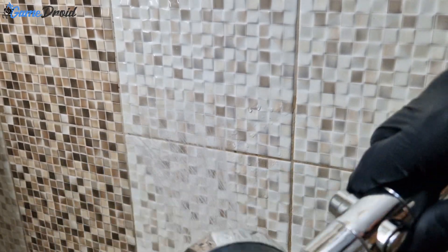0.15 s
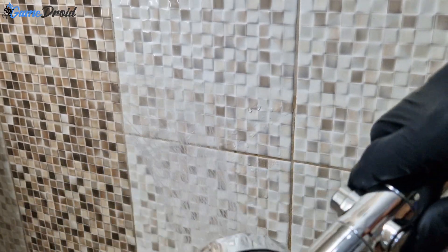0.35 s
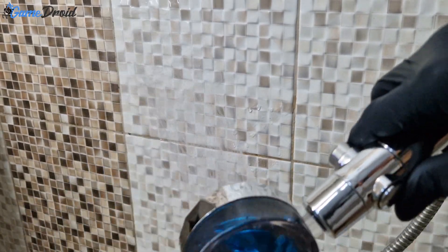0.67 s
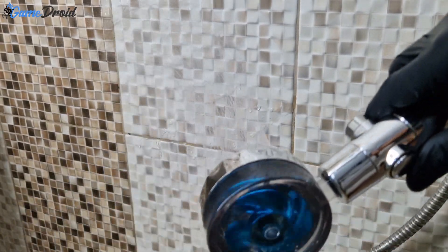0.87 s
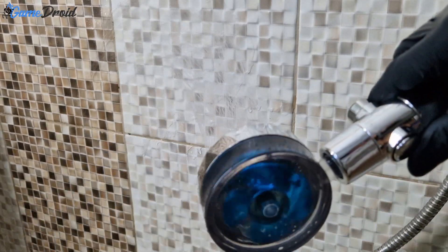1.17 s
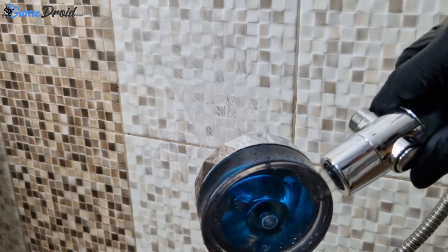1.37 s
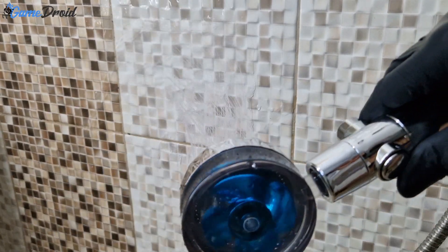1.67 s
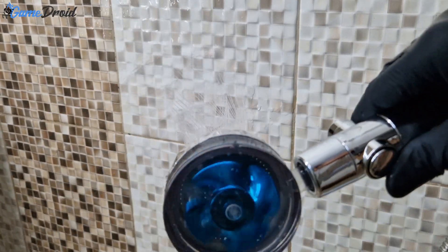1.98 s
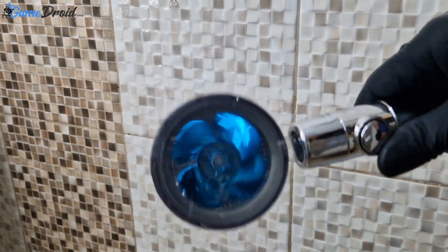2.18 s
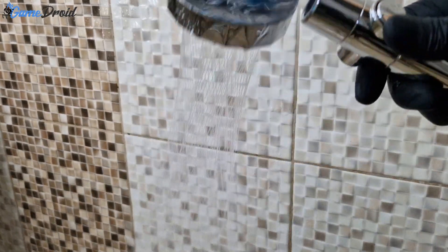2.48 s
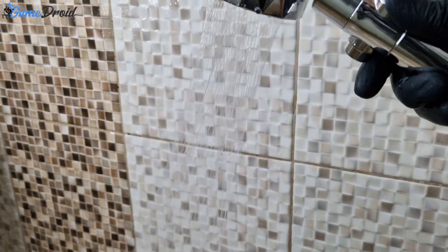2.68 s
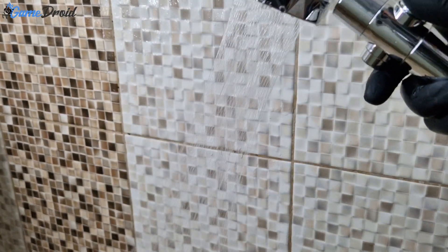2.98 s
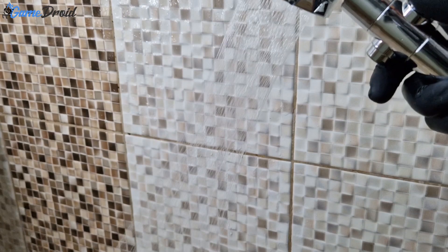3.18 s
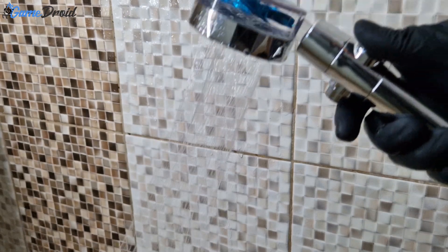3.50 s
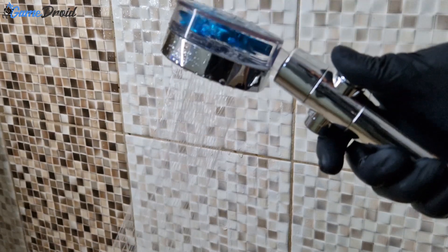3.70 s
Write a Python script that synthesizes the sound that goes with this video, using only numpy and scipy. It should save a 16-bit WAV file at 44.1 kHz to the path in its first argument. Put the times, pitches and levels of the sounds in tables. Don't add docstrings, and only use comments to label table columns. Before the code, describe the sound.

Shower water fizzes steadily in a small tiled bathroom, swelling briefly with splashes and hollow drips

```python
import sys
import numpy as np
from scipy import signal
from scipy.fft import rfft, irfft, next_fast_len
from scipy.io import wavfile
from scipy.ndimage import uniform_filter1d, map_coordinates

SR = 44100
rng = np.random.default_rng(int(sys.argv[2]) if len(sys.argv) > 2 else 0)


def voltage_ratio(level):
    return 10 ** (np.asarray(level, float) / 20)


def wav_out(sig):
    wavfile.write(sys.argv[1], SR, np.round(np.clip(np.atleast_2d(sig).T, -1, 1) * 32767).astype(np.int16))


N = 169785


def unit(x):
    return x / np.sqrt(np.mean(x ** 2) + 1e-20)


def along(points, hz):
    f, v = np.transpose(points)
    return np.interp(np.log(hz + 1), np.log(f + 1), v)


def curves(rows):
    s, *cols = np.transpose(rows)
    return [np.interp(np.arange(N) / SR, s, c) for c in cols]


def wobble(rate):
    return map_coordinates(rng.standard_normal(N // 100), [np.arange(N) * rate / SR])


def filtered(x, response):
    m = next_fast_len(N + SR // 2)
    return irfft(rfft(x, m) * response(np.fft.rfftfreq(m, 1 / SR)), m)[..., :N]


# [f/Hz, likeness 0-1]
LIKENESS = [(60, 0.87), (200, 1), (400, 0.68), (700, 0.44), (1200, 0.012), (2500, 0.025), (15000, .0)]


def spread(pair, gain):
    turn = lambda hz: np.arccos(np.clip(along(LIKENESS, hz), -1, 1)) / 2
    mid, side = filtered(pair, lambda hz: gain(hz) * [np.cos(turn(hz)), np.sin(turn(hz))])
    return unit(np.array([mid + side, mid - side]))


def droplets(patchy_db):
    drops_per_s, size_db, direct = 9000, 2, 0.19
    hit = rng.random((2, N)) < drops_per_s / SR
    size = voltage_ratio(size_db * np.minimum(rng.exponential(size=(2, N)), 3))
    ticks = unit(hit * rng.standard_normal((2, N)) * size)
    echoes = rng.standard_normal((2, N))
    z = signal.stft(direct * ticks + np.sqrt(1 - direct ** 2) * echoes, nperseg=512)[2]
    field = uniform_filter1d(rng.standard_normal(z.shape[1:]), size=4, axis=0)
    field = uniform_filter1d(field, size=5, axis=1)
    return signal.istft(z * voltage_ratio(patchy_db * unit(field)), nperseg=512)[1][:, :N]


def pings(start_s, gain, hz, tau_s, rise, pan):
    t = np.arange(SR // 8) / SR
    u = t / tau_s[:, None]
    envelope = np.exp(-u) * (1 - np.exp(-t / .0012))
    glide = 1 + rise * np.minimum(u, 3)
    wave = gain[:, None] * envelope * np.sin(2 * np.pi * hz[:, None] * t * glide)
    at = np.round(start_s * SR).astype(int)[:, None] + np.arange(len(t))
    lag = np.round(pan * 12).astype(int)[:, None]

    def ear(side):
        heard = wave * voltage_ratio(side * 2 * pan)[:, None]
        return np.bincount((at + 20 + side * lag).ravel(), heard.ravel(), N + SR)[20:N + 20]

    return np.array([ear(-1), ear(1)])


def plinks():
    per_s, centre_hz, cycles, level_db = 220, 3566, 5, -22
    draw = rng.random((700, 5))
    s = np.cumsum(-np.log(draw[:, 0])) / per_s + 1.9
    s, draw = s[s < N / SR], draw[s < N / SR]
    hz = centre_hz * np.exp(0.87 * (draw[:, 1] - .5))
    gain = voltage_ratio(level_db - 5.77 * np.log(draw[:, 2]))
    return pings(s, gain, hz, cycles * (.5 + draw[:, 3]) / hz, 0.019, 2 * draw[:, 4] - 1)


# [t/s, level/dB, share of the jets on the tray 0-1]
AIM = [(0, -47, 0), (.14, -50, 0.3), (.24, -47, 0.16), (.32, -47.5, 0.14), (1.0, -46.5, 0),
       (2.4, -46.5, 0.03), (2.58, -51.5, 0.18), (2.635, -49.5, 0.5), (2.66, -41, 0.8), (2.8, -37.5, 0.8),
       (2.88, -35.5, 0.77), (3.04, -38, 0.95), (3.2, -42.5, 0.58), (3.33, -39, 0.73), (3.41, -44.5, 0.63),
       (3.63, -47.5, 0.06), (3.72, -44.5, 0.05), (3.85, -48.5, 0.2)]
# [f/Hz, level/dB]
WALL_COLOUR = [(600, -13), (1800, -11), (3800, -7.5), (5500, -7.5), (8800, -8), (9500, -2.5), (12500, -2),
               (15500, -3.5)]
# [f/Hz, level/dB]
TRAY_COLOUR = [(700, -28), (2000, -20.5), (2800, -4.5), (4800, 0), (6500, -.5), (8800, -3), (9500, 2),
               (15500, -3.5)]


def spray():
    level_db, share = curves(AIM)
    share = np.clip(share, 0, 1)
    gain = voltage_ratio(level_db + .25 * wobble(5) + .45 * wobble(16))
    wall = spread(droplets(patchy_db=1.28), lambda hz: voltage_ratio(along([(100, -32)] + WALL_COLOUR, hz)))
    wall = wall * voltage_ratio(0.093 * wobble(7.68))
    tray = spread(droplets(patchy_db=1.2), lambda hz: voltage_ratio(along([(100, -60)] + TRAY_COLOUR, hz)))
    tray = tray * voltage_ratio(.5 * wobble(23))
    return gain * (np.sqrt(1 - share) * wall + np.sqrt(share) * (tray + plinks()))


def modes(table, f):
    return sum(voltage_ratio(2 * db) / (1 + (2 * (f - c) / w) ** 4) for c, w, db in table)


# [t/s, level/dB]
RUNOFF_LEVEL = [(0, -59), (.3, -56.5), (.7, -59), (1.2, -62.5), (1.7, -61.5), (2.3, -62.5), (2.55, -64),
                (2.85, -59.5), (3.1, -62), (3.85, -61)]
# [f/Hz, width/Hz, level/dB]
RUNOFF_ROOM_MODES = [(289, 49, -4.5), (346, 40, -4), (402.7, 24, -1.5), (489.5, 6, 3), (537.6, 14.4, 0),
                     (644, 180, -13), (741, 30, 2.5), (808, 38, -1), (892, 57, -6), (1034, 96, -3),
                     (1238.5, 15.5, 3.5), (1466, 43, 1.5), (2063, 180, -4)]
# [f/Hz, level/dB]
WASH = [(30, -31), (90, -8), (150, -14.5), (300, -19), (900, -11.5), (2000, -5.5), (4000, -16)]


def runoff():
    level_db, = curves(RUNOFF_LEVEL)
    lumpy = droplets(patchy_db=1.5) * voltage_ratio(1.4 * wobble(18))
    tray = spread(lumpy, lambda f: np.sqrt(voltage_ratio(2 * along(WASH, f)) + modes(RUNOFF_ROOM_MODES, f)))
    return voltage_ratio(level_db) * tray


# [f/Hz, width/Hz, level/dB]
ROOM_MODES = [(60, 29, -6), (95.5, 17, -14), (209.4, 23, -0.5), (222, 16, -4.5)]
# [t/s, level/dB]
ROOM_LEVEL = [(0, -69.5), (.5, -71.5), (1.2, -73.5), (1.6, -72), (2.4, -74), (3.0, -83), (3.45, -71.5),
              (3.85, -81)]


def room():
    level_db, = curves(ROOM_LEVEL)
    return voltage_ratio(level_db) * spread(rng.standard_normal((2, N)), lambda f: np.sqrt(modes(ROOM_MODES, f)))


# [t/s, level/dB]
PIPE_LEVEL = [(0.0, -82), (0.1, -72), (0.14, -97), (0.23, -74), (0.45, -85.5), (0.48, -74.5), (1.31, -79),
              (1.67, -71), (1.71, -80), (2.04, -66.5), (2.53, -76.5), (2.69, -70.5), (2.94, -84),
              (2.98, -72), (3.26, -77), (3.29, -72), (3.83, -65), (3.85, -72)]


def pipe():
    pipe_hz, rough = 61, .5
    level_db, = curves(PIPE_LEVEL)
    phase = 2 * np.pi * np.cumsum(pipe_hz + 2.6 * wobble(5.95)) / SR
    hum = unit((1 + rough * wobble(14)) * np.sin(phase) + rough * wobble(29) * np.cos(phase))
    return voltage_ratio(level_db) * hum * voltage_ratio([[-.4], [.4]])


# [t/s, peak level/dB, f/Hz, length/s]
HOSE_THUDS = [
    (.08, -67, 60, 0.019),
    (0.253, -68, 75, .03),
    (2.063, -69, 22, .2),
    (2.974, -68, 80.4, .025),
    (3.165, -68, 78, 0.028),
    (3.238, -71, 95, 0.05),
]


def hose():
    t = np.arange(N) / SR
    thud = 0
    for s, db, hz, long_s in HOSE_THUDS:
        thud = thud + voltage_ratio(db) * np.exp(-((t - s) / long_s) ** 2) * np.sin(2 * np.pi * hz * (t - s))
    return thud * voltage_ratio([[-.4], [.4]])


# [t/s, level/dB, centre f/Hz, length/s]
SLAPS = [
    (0.231, -55.5, 530, 0.048),
    (0.235, -50, 1900, 0.024),
    (0.346, -65, 1000, 0.034),
    (0.982, -56, 2000, 0.045),
    (2.747, -56.5, 1520, 0.051),
    (2.742, -58, 900, 0.059),
    (2.787, -58.5, 547, 0.026),
    (2.903, -65, 820, 0.033),
    (2.97, -44, 3080, 0.026),
    (3.303, -60, 3500, 0.032),
]


def slaps():
    octaves = .8
    t, out = np.arange(N) / SR, 0
    for s, db, hz, long_s in SLAPS:
        u = np.maximum(t - s, 0)
        band = lambda f: np.exp(-(np.log2((f + 1) / hz) / octaves) ** 2)
        noise = spread(rng.standard_normal((2, N)), band)
        out = out + voltage_ratio(db) * (1 - np.exp(-u / 0.0023)) * np.exp(-u / long_s) * noise
    return out


# [t/s, peak level/dB, f/Hz, t60/s]
DRIPS_AND_PINGS = [(.232, -50.5, 740, 0.085), (.236, -55, 480, .08), (.255, -59, 487, 0.15), (.272, -63, 358, .15),
                   (.235, -55, 1400, .07), (.346, -53, 780, 0.083), (.37, -64, 790, .08), (.372, -64, 374, 0.044),
                   (.425, -57, 790, 0.15), (.48, -56.5, 760, 0.12), (.515, -60, 686, 0.074), (1.685, -58, 526, 0.069),
                   (1.708, -61, 604, 0.065), (1.725, -56, 776, .1), (1.73, -58, 480, .1), (1.8, -54, 740, 0.078),
                   (.40, -56, 814, 0.13), (.46, -61, 755, 0.13), (.50, -57, 780, 0.12), (.6, -56, 1464, 0.35),
                   (.6, -56, 770, 0.27), (.985, -57, 1460, 0.28), (1.555, -60, 730, 0.14), (1.643, -53, 730, 0.11),
                   (1.643, -58.5, 544, 0.13), (1.715, -62, 710, 0.089), (1.718, -60, 580, 0.095),
                   (1.755, -59, 732, 0.15), (1.795, -63, 716, .09), (1.795, -54.5, 563, 0.081),
                   (2.612, -45, 2870, 0.045), (2.74, -44, 2260, 0.065), (2.765, -49, 2300, .06),
                   (2.74, -62, 770, .08), (2.762, -59, 1140, .1), (2.79, -66, 646, .1), (2.9, -62, 910, .1),
                   (2.871, -42, 2970, 0.043), (2.893, -36, 2940, 0.036), (2.915, -35, 3110, 0.03),
                   (1.2, -64, 347, 0.15), (2.738, -60.5, 423, .15), (2.79, -60, 410, 0.075), (2.755, -52, 1550, .07),
                   (2.775, -52, 1900, .06), (2.82, -60.5, 750, 0.087), (2.976, -42, 2180, 0.08),
                   (2.976, -50, 2630, 0.067), (2.977, -40, 3380, .06), (.233, -66, 303, .1), (.375, -49, 2090, .05),
                   (.345, -59, 1460, .2), (0.346, -62, 1230, .2)]


def drips():
    detune = 0.035
    s, db, hz, t60 = np.repeat(np.transpose(DRIPS_AND_PINGS), 3, axis=1)
    draw = rng.random((len(s), 2))
    step = (np.arange(len(s)) % 3 - 1) * (.5 + draw[:, 0])
    gain = voltage_ratio(db - 4 - 5 * abs(step))
    return pings(s, gain, hz * (1 + detune * step), t60 / np.log(1000), 0, .6 * (draw[:, 1] - .5))


def walls(x):
    depth_db, spacing_hz = 1.5, 30
    knots = rng.standard_normal((2, 1000))
    comb = lambda f: np.array([np.interp(f / spacing_hz, np.arange(1000), k) for k in knots])
    return filtered(x, lambda f: voltage_ratio(depth_db * comb(f) * (f > 900)))


def scene():
    water = spray() + runoff() + room() + slaps()
    return walls(water) + drips() + pipe() + hose()


def roll_off(x):
    return signal.sosfilt(signal.butter(12, 16750, fs=SR, output="sos"), x)


# [f/Hz, level/dB]
LEFT_OVER_RIGHT = [(60, 2), (250, 2), (1500, 1.4), (5000, 2.5), (10000, 3.5)]
# [f/Hz, width/Hz, level/dB]
PORT_LEFT = [(3700, 300, -1.5), (6900, 250, -2), (7500, 400, 2.5), (11100, 300, -1.5), (11600, 250, 2.5),
             (15000, 900, 4)]
# [f/Hz, width/Hz, level/dB]
PORT_RIGHT = [(3900, 300, -1.5), (4900, 400, 1.5), (7500, 400, 1.2), (10300, 500, 1.5), (11200, 450, -2.5),
              (12500, 1200, 2)]


def record(dry):
    top_hz, top_soft_hz = 15540, 25
    bumps = lambda table, f: sum(db * np.exp(-((f - c) / w) ** 2) for c, w, db in table)
    ports = lambda f: np.array([bumps(PORT_LEFT, f), bumps(PORT_RIGHT, f)])
    balance = lambda f: along(LEFT_OVER_RIGHT, f) / 2 * np.array([[1], [-1]])
    edge = lambda f: np.clip((top_hz - f) / (4 * top_soft_hz), 0, 1)
    mix = filtered(dry, lambda f: edge(f) * voltage_ratio(balance(f) + ports(f)))
    return roll_off(mix)


dry = scene()
out = record(dry)
wav_out(out)
```